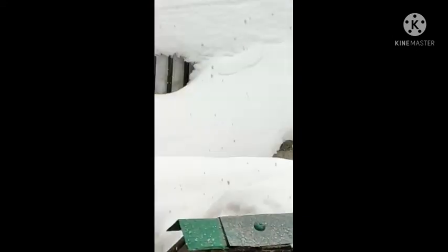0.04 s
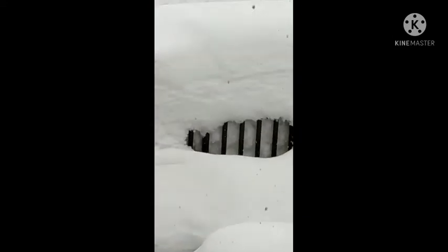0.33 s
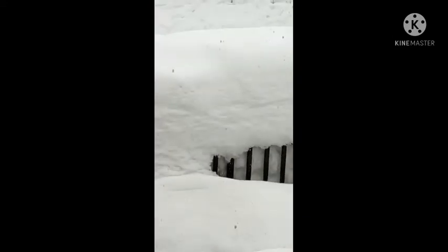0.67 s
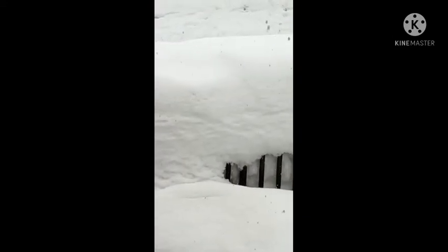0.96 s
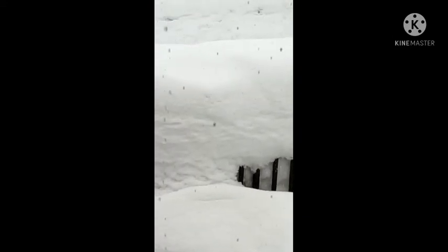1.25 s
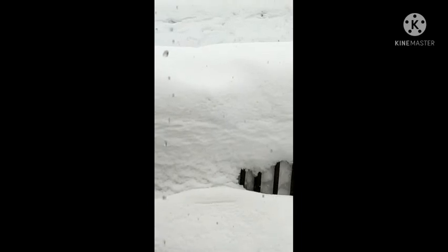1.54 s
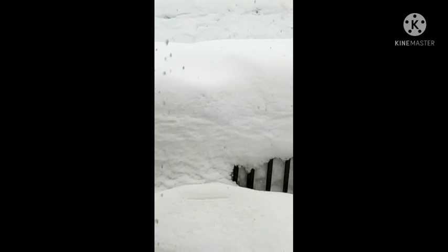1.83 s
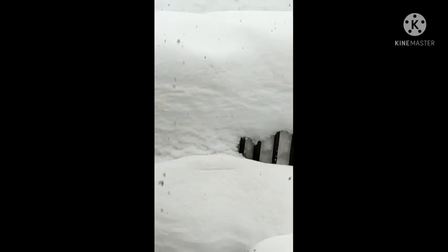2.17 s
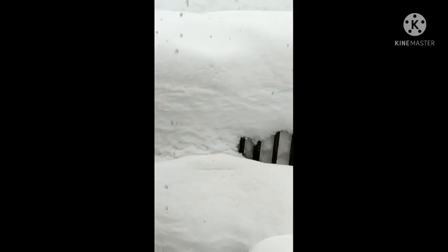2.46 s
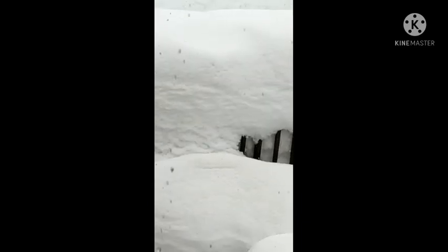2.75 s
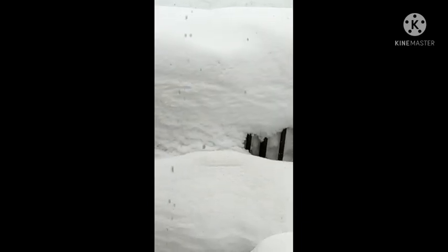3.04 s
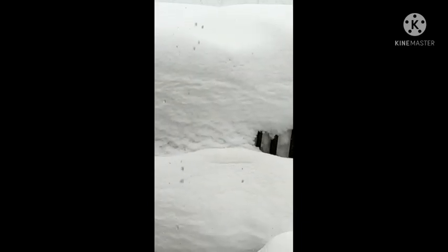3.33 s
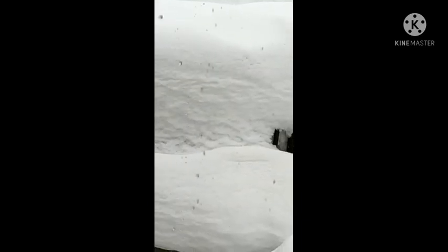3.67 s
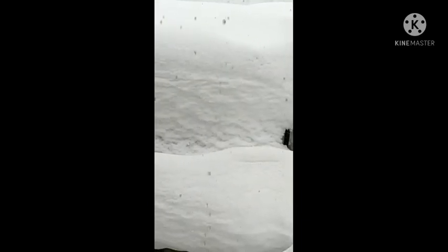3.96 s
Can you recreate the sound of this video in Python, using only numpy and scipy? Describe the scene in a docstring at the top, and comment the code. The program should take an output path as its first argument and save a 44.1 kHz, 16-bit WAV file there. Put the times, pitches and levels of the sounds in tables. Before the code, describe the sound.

Wet snow falls in a soft hiss from the start, with irregular close splats, drips and tiny icy ticks over a faint murmur of wind. The sound fades to silence just before 2 seconds and cuts back in at about 2.3 seconds, slightly quieter. Light wind buffets the microphone with low thuds from about 2.8 to 3.3 seconds, and the hiss and patter continue until 4 seconds.

```python
"""Wet snow in a yard

Countless far flakes merge into a soft hiss. Near clumps splat, drops and pellets tap, icy grains tick.
Faint air murmurs underneath and briefly buffets the microphone with low thuds and throbs.
The sound fades out just before 2 s and cuts back in, a little quieter, a third of a second later."""
import sys
import numpy as np
from scipy import signal
from scipy.io import wavfile

SR = 44100
rng = np.random.default_rng(int(sys.argv[2]) if len(sys.argv) > 2 else 0)


def persist_wave(psi):
    """Save psi, clipped to +-1, as 16-bit WAV."""
    counts = np.round(np.clip(psi, -1, 1) * 32767).astype(np.int16)
    wavfile.write(sys.argv[1], SR, np.atleast_2d(counts).T)


N = 176400
TIME_S = np.arange(N) / SR

# far flake hiss: (time [s], level [dB])
HISS_LEVEL = [(0, -39.5), (.3, -40.5), (.55, -41.5), (.9, -41), (1.2, -41), (1.42, -39), (1.52, -40.5),
              (1.69, -40.5), (1.75, -43), (1.87, -43), (2.35, -43), (2.75, -43.5), (3.1, -42.5),
              (3.35, -45), (3.6, -43.5), (3.75, -46), (3.87, -43), (4, -41.5)]
# far flake hiss: (frequency [Hz], density [dB])
HISS_SPECTRUM = [(290, -38), (500, -5.5), (648, -7), (876, -6), (1560, 0), (1850, -1), (2430, 0),
                 (3740, -5), (4770, -6), (6270, -8), (8980, -8), (14800, -16.5), (15500, -14.5)]
# near clumps: (onset [s], level [dB], treble tilt [dB/octave], decay [s])
SPLATS = [(.112, -46.5, 7.5, 0.038), (0.187, -36.5, 0, 0.071), (.243, -41, 2.5, 0.022),
          (0.318, -34.5, 0, 0.016), (0.43, -36, 0, 0.046), (0.45, -36, -6, 0.022),
          (0.605, -37.5, -3, 0.046), (0.675, -34, -3.5, 0.03), (.691, -43, 3, 0.03),
          (0.772, -34.5, -1.5, 0.045), (.828, -34.5, -2, 0.016), (0.904, -34.3, -4.5, .022),
          (0.981, -35, -3, 0.037), (1.02, -37, -3, 0.017), (1.097, -34.5, -5, 0.032),
          (1.208, -36, -3, 0.027), (1.264, -39, 2.5, 0.018), (1.311, -36.5, -1, 0.02),
          (1.393, -43, 4.5, 0.047), (1.442, -32, -2, 0.013), (1.614, -39, -3, 0.027), (1.68, -41, -5, .02),
          (1.785, -38, -5, 0.021), (1.854, -38.5, -7, 0.0094), (1.908, -47, 4.5, 0.019),
          (2.319, -43.5, -1.5, .02), (2.372, -49, -8, 0.015), (2.471, -45, 1, 0.019),
          (2.548, -39, 6, 0.0073), (2.584, -35, -1, 0.01), (2.66, -41.5, 4, 0.02), (2.677, -39, 0, 0.041),
          (2.784, -38, 2, 0.012), (2.881, -42.5, 0, 0.043), (2.95, -39.5, -2, 0.026), (2.987, -48, 3, .015),
          (3.045, -43, 0, 0.015), (3.09, -40, -3, 0.02), (3.186, -36.5, -1, 0.03),
          (3.204, -34, -0.5, 0.021), (3.308, -44, -3, .025), (3.381, -40, -2.5, 0.027),
          (3.464, -49, 6, 0.011), (3.5, -43.5, 4.5, 0.02), (3.563, -44.5, 2.5, 0.024),
          (3.637, -40.5, 3.5, 0.012), (3.653, -38.5, -0.5, 0.043), (3.695, -41, -3, .012),
          (3.775, -41.5, -3.5, .025), (3.841, -37, -1.5, 0.029), (3.907, -39, -0.5, 0.02),
          (3.944, -41, 0.5, 0.022)]
# splats and ticks: (frequency [Hz], density [dB])
GRAIN_SPECTRUM = [(500, -15.5), (900, -15.5), (1500, -0.5), (2500, 0.5), (3800, 0.5), (6000, -0.5),
                  (9000, -3), (12000, -6), (15500, -22)]
# drops and pellets: (onset [s], pitch [Hz], peak [dB], left minus right [dB])
TAPS = [(.119, 9300, -33, 3), (.251, 6300, -40, 2), (.322, 8960, -32, 12), (.435, 8100, -41, 5),
        (.447, 7580, -35, 7), (.451, 3070, -39, 5), (.458, 1520, -31.5, 5), (.618, 4340, -32, 12),
        (.692, 2310, -36, 12), (.699, 8960, -32, 12), (.787, 5800, -34, 14), (.995, 6030, -35, 14),
        (1.024, 1360, -38, 5), (1.1, 8960, -37, 11), (1.28, 9900, -32, 6), (1.314, 3450, -36, 14),
        (1.396, 8790, -26, 3), (1.443, 2580, -32, 13), (1.687, 3270, -34, 7), (1.789, 5340, -41, 4),
        (1.912, 2930, -43, -2), (2.373, 2420, -34, 16), (2.499, 9820, -40, 8), (2.551, 8440, -36, 15),
        (2.588, 5800, -36, 14), (2.589, 2900, -34.5, -4), (2.672, 9470, -39, 5), (2.679, 9130, -38, 8),
        (2.793, 4930, -32, 15), (2.895, 2070, -40, 15), (3.045, 8610, -34, 7), (3.089, 3220, -33, 13),
        (3.19, 1390, -37, 4), (3.207, 6330, -31, 1), (3.388, 5510, -35, 13), (3.471, 2070, -37, 16),
        (3.506, 7400, -36, 4), (3.607, 2280, -33, 15), (3.64, 2430, -29.5, 7), (3.845, 2410, -31.5, 13),
        (3.945, 5000, -41, 14)]
# puffs on the microphone: (centre [s], centre to peak [s], peak [dB])
PUFFS = [(0.184, 0.018, -44), (2.758, 0.009, -26.5), (2.775, 0.0043, -34), (3.018, .006, -44),
         (3.03, 0.013, -40.5), (3.247, 0.013, -44), (3.295, 0.01, -51)]
# low throbs: (onset [s], length [s], pitch [Hz], level [dB])
THROBS = [(1.74, 0.21, 48.4, -51.5), (2.76, 0.2, 51.8, -42.5), (2.978, 0.23, 50.8, -38.5),
          (3.916, 0.073, 46, -47)]
# air murmur: (time [s], level [dB])
AIR_LEVEL = [(0, -53), (.8, -53), (1.85, -55.5), (2.35, -55), (3.1, -55.5), (4, -56)]
# air murmur: (frequency [Hz], density [dB])
AIR_SPECTRUM = [(20, 10), (45, 1), (80, -1.5), (150, -3.5), (300, -4.5), (500, -4.5), (700, -8.5),
                (1200, -26.5)]
# far drones: (pitch [Hz], width [Hz], level [dB], centre [s], swell sigma [s])
DRONES = [(180, 4.8, -60.5, 1.45, 0.17), (657, 41, -62.5, 1.27, 0.74), (340, 11, -68, 1.4, 0.5)]
# stereo width of the noise: (frequency [Hz], left-right correlation [-1..1])
CORRELATION = [(60, 0.77), (290, 0.82), (500, 0.73), (850, -0.26), (1500, 0.14), (2700, 0.18), (3700, 0),
               (4800, 0), (7500, -.12), (15000, 0)]
# stereo balance of the noise: (frequency [Hz], left minus right [dB])
BALANCE = [(60, 1.6), (200, 2.1), (700, 2), (1300, 1.57), (2400, 4.4), (4400, 1.2), (15000, 1.9)]

SNOW_EDGES_HZ, AIR_EDGES_HZ = np.geomspace(560, 17000, 19), np.geomspace(20, 1280, 11)


def far_flakes(flutter_db=0.73, patchy_db=1.77):
    """Countless far flakes merge into a hiss that flutters overall and per band."""
    level_db = in_time(HISS_LEVEL) + flutter_db * drift(35)
    bands = noise_bands(HISS_SPECTRUM, SNOW_EDGES_HZ)
    return sum(band * from_db(level_db + patchy_db * drift(40)) for hz, band in bands)


def near_splats(attack_s=0.004, pivot_hz=3000, sparkle_db=1.5):
    """Wet clumps burst into short sprays of grains, each with its own brightness and decay."""
    onset_s, level_db, tilt_db_per_octave, decay_s = np.transpose(SPLATS)[:, :, None]
    age_s = np.clip(TIME_S - onset_s, 0, 1)
    power_shapes = (1 - np.exp(-2 * age_s / attack_s)) * np.exp(-2 * age_s / decay_s)
    out = np.zeros((2, N))
    for hz, band in noise_bands(GRAIN_SPECTRUM, SNOW_EDGES_HZ):
        gains = from_db(level_db + tilt_db_per_octave * np.log2(hz / pivot_hz))
        envelope = np.sqrt(gains.T ** 2 @ power_shapes)  # splats add in power
        out += band * envelope * from_db(sparkle_db * (drift(130) - 0.5))
    return out * pan(1.5)


def drop_taps(t60_cycles=61):
    """Close drops and icy pellets each ring for an instant at one pitch."""
    out = np.zeros((2, N))
    for onset_s, hz, peak_db, side_db in TAPS:
        cycles = hz * np.clip(TIME_S - onset_s, 0, 0.1)
        gains = pan(side_db) / np.linalg.norm(pan(side_db))
        out += gains * from_db(peak_db - 60 * cycles / t60_cycles) * np.sin(2 * np.pi * cycles)
    return out


def grain_ticks(rate_per_s=1200, re_hiss_db=-12, spread_db=2, t60_cycles=55):
    """Icy grains strike at random and ring briefly, each at its own pitch and side."""
    sizes = from_db(spread_db * np.minimum(rng.exponential(1, N), 5)) * rng.choice([-1, 1], N)
    sizes *= rng.random(N) < rate_per_s / SR
    pitches_hz = np.geomspace(2300, 14000, 44)
    pitch_index = rng.integers(0, len(pitches_hz), N)
    pan_rad = rng.uniform(0, np.pi, N)
    clicks = sizes * np.array([np.cos(pan_rad), np.sin(pan_rad)])
    out = np.zeros((2, N))
    for k, hz in enumerate(pitches_hz):
        radius = np.exp(-np.log(1000) * hz / (t60_cycles * SR))
        feedback = [1, -2 * radius * np.cos(2 * np.pi * hz / SR), radius ** 2]
        rings = signal.lfilter([1, 0, -1], feedback, clicks * (pitch_index == k) + 1e-18)
        out += np.sqrt(hz) * from_db(at_hz(GRAIN_SPECTRUM, hz)) * rings
    return unit_rms(out) * from_db(in_time(HISS_LEVEL) + re_hiss_db) * pan(2.5)


def buffets(edge_s=0.018, fade_db_per_s=26, waver_db=2, rumble_db=-7, rumble_hz=32):
    """Puffs push the microphone once each way; low throbs waver and die over an uneven rumble."""
    out = np.zeros(N)
    waver = from_db(waver_db * drift(14))
    rumble = from_db(rumble_db) * drift(12) * np.sin(2 * np.pi * rumble_hz * TIME_S)
    for centre_s, width_s, peak_db in PUFFS:
        offset = (TIME_S - centre_s) / width_s
        out += from_db(peak_db) * offset * np.exp((1 - offset ** 2) / 2)
    for onset_s, length_s, hz, level_db in THROBS:
        age_s = TIME_S - onset_s
        gate = np.clip(np.minimum(age_s, length_s - age_s) / edge_s, 0, 1)
        envelope = gate * from_db(level_db - fade_db_per_s * np.maximum(age_s, 0))
        out += envelope * (waver * np.sin(2 * np.pi * hz * age_s) + rumble)
    return out * pan(2.9)


def air_murmur(patchy_db=2):
    """Light wind: low noise, each band wandering in level."""
    bands = noise_bands(AIR_SPECTRUM, AIR_EDGES_HZ)
    return from_db(in_time(AIR_LEVEL)) * sum(band * from_db(patchy_db * drift(8)) for hz, band in bands)


def far_drones():
    """Faint narrow-band hums swell and fade in the distance."""
    out = np.zeros(N)
    for hz, width_hz, level_db, centre_s, sigma_s in DRONES:
        wander = drift(width_hz) + 1j * drift(width_hz)
        tone = np.real(wander * np.exp(2j * np.pi * hz * TIME_S))
        swell = np.exp(-((TIME_S - centre_s) / sigma_s) ** 2 / 2)
        out += tone * from_db(level_db) * swell
    return out * pan(2.5)


def noise_bands(spectrum, edges_hz):
    """Yield (centre [Hz], stereo noise band); powers sum to 1 before panning."""
    centres_hz = np.sqrt(edges_hz[1:] * edges_hz[:-1])
    power = from_db(at_hz(spectrum, centres_hz)) ** 2 * np.diff(edges_hz)
    white = rng.standard_normal((2, 2, N))
    for k, hz in enumerate(centres_hz):
        bandpass = signal.butter(2, edges_hz[k:k + 2], "band", fs=SR, output="sos")
        mid, side = signal.sosfilt(bandpass, white[k % 2])  # adjacent bands are independent
        correlation = at_hz(CORRELATION, hz)
        band = unit_rms(np.sqrt(1 + correlation) * mid + np.sqrt(1 - correlation) * side * [[1], [-1]])
        yield hz, band * np.sqrt(power[k] / power.sum()) * pan(at_hz(BALANCE, hz))


def drift(corner_hz, hop=40, warmup=2000):
    """Low-passed random wander, unit RMS."""
    pole = np.exp(-2 * np.pi * corner_hz * hop / SR)
    white = rng.standard_normal(N // hop + warmup + 2)
    slow = signal.lfilter([1], [1, -2 * pole, pole ** 2], white)[warmup:]
    return np.interp(np.arange(N) / hop, np.arange(len(slow)), unit_rms(slow))


def from_db(db):
    """Decibels to gain."""
    return 10 ** (np.asarray(db) / 20)


def unit_rms(x):
    """Scale to unit power."""
    return x / np.sqrt(np.mean(x ** 2) + 1e-20)


def in_time(curve):
    """Interpolate at every sample."""
    return np.interp(TIME_S, *np.transpose(curve))


def at_hz(curve, hz):
    """Interpolate on a log-frequency axis."""
    knots_hz, values = np.transpose(curve)
    return np.interp(np.log(hz), np.log(knots_hz), values)


def pan(side_db):
    """Stereo gains for a left-minus-right level."""
    return from_db(np.array([[side_db], [-side_db]]) / 2)


def scene(crossfeed_db=-17, crossfeed_s=0.00039):
    """Snow over moving air; a little of the snow's right side reaches the left ear late."""
    snow = far_flakes() + near_splats() + drop_taps() + grain_ticks()
    snow[0] += from_db(crossfeed_db) * np.interp(TIME_S - crossfeed_s, TIME_S, snow[1])
    return snow + buffets() + air_murmur() + far_drones()


def record(dry, fade_s=1.915, silent_s=2.0, resume_s=2.318, cutoff_hz=15600):
    """Fade to silence, hard return with a settling offset per channel, steep low-pass."""
    fade_db_per_s, close_s = 212, 0.011
    left_fall_s, right_rise_s, right_fall_s = 0.042, 0.059, 0.24
    fade = from_db(-fade_db_per_s * np.maximum(TIME_S - fade_s, 0))
    gate = np.clip((silent_s - TIME_S) / close_s, 0, 1)
    age_s = np.maximum(TIME_S - resume_s, 0)
    left = from_db(-35) * np.exp(-age_s / left_fall_s)
    right = from_db(-23) * (1 - np.exp(-age_s / right_rise_s)) * np.exp(-age_s / right_fall_s)
    out = np.where(TIME_S < resume_s, dry * fade * gate, dry + np.array([left, right]))
    return signal.sosfilt(signal.ellip(12, 0.1, 70, cutoff_hz, fs=SR, output="sos"), out)


dry = scene()
out = record(dry)
persist_wave(out)
```